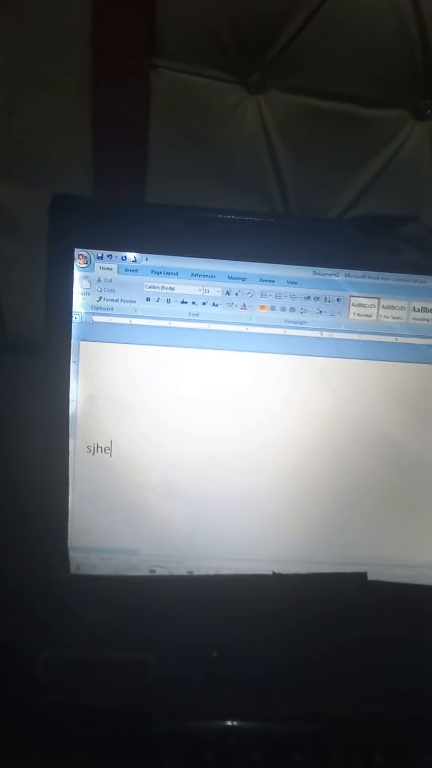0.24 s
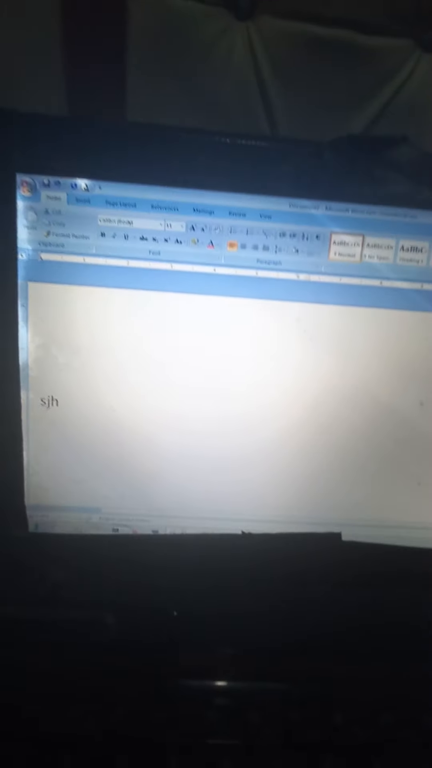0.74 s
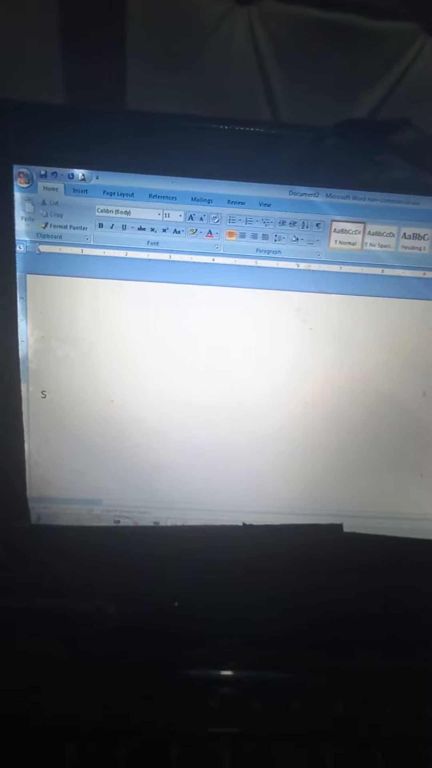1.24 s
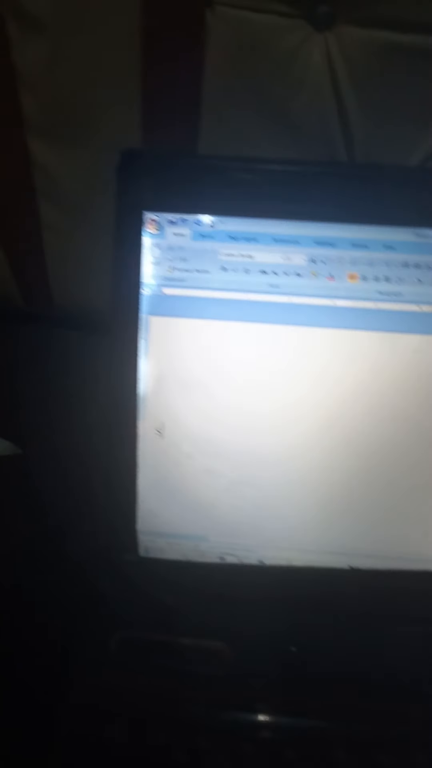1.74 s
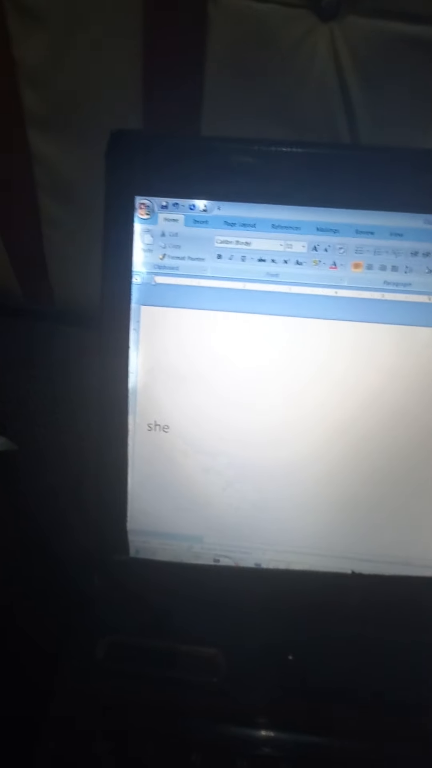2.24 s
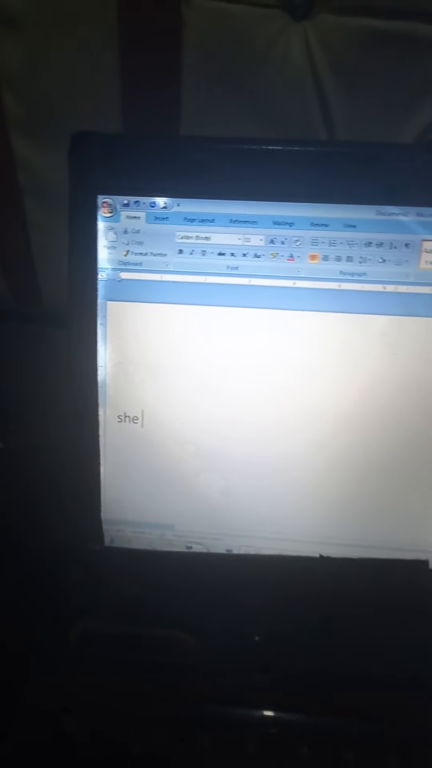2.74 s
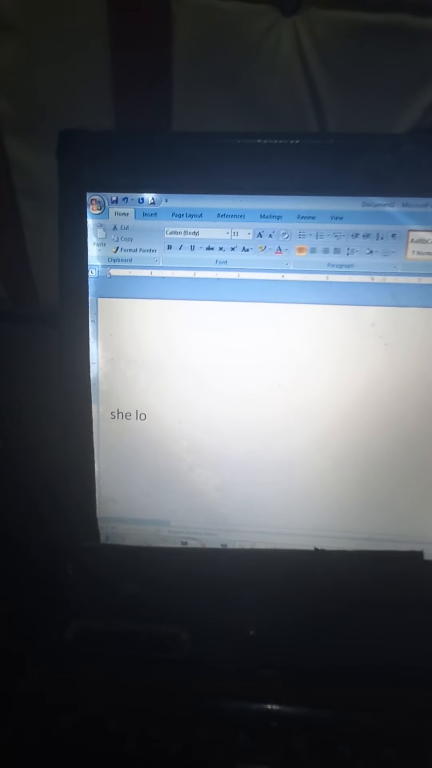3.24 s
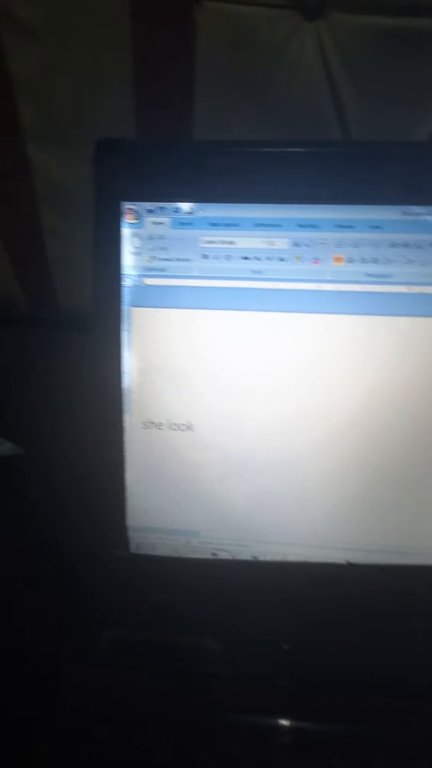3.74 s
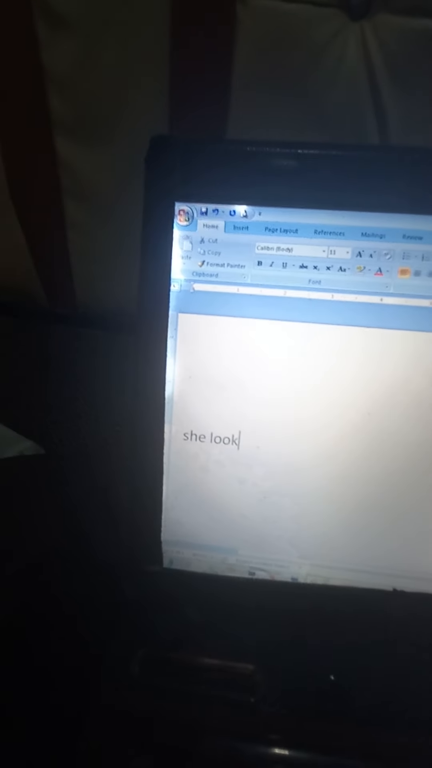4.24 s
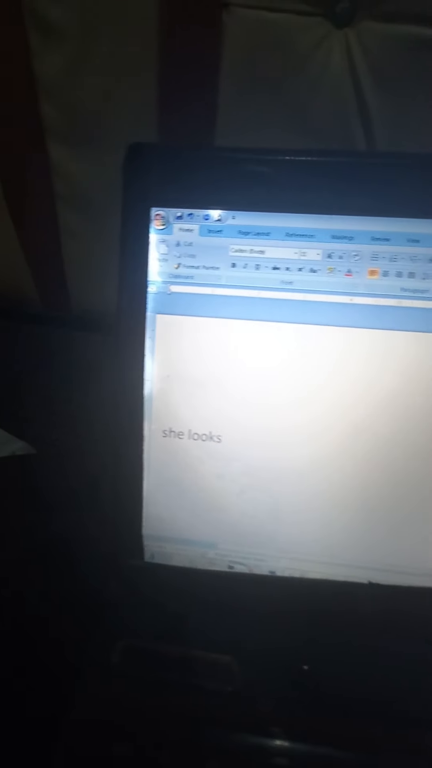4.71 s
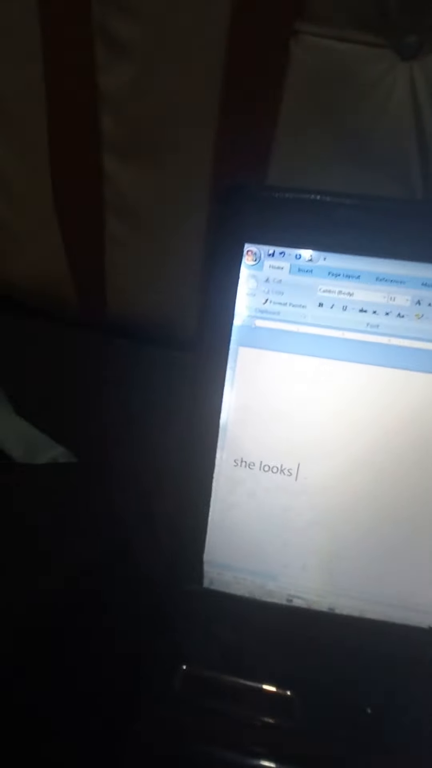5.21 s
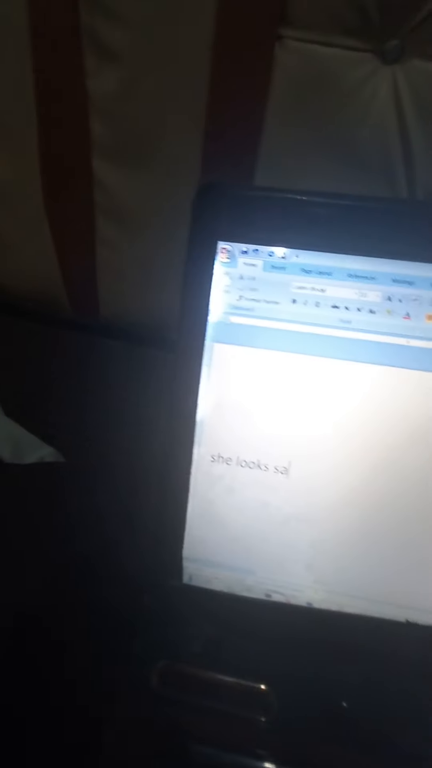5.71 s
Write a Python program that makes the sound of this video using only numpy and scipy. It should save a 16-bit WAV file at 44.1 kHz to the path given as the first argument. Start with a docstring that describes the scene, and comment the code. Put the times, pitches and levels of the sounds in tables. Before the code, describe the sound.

Laptop keys are pressed slowly, one at a time, just below the microphone in a small room. Each gives a plastic clack with a slight thud, and many tick faintly as they spring back. The strokes come unevenly, with a quick little cluster early on and short pauses later. A fan hisses steadily throughout, and moving air buffets the microphone with a low, lumpy rumble.

```python
"""Slow, one-finger typing on a laptop in a small room, from a hand-held microphone just above the keys.
Each key ticks under the nail, hits bottom with a plastic clack and a thud of the case; most spring back
faintly. A fan hisses steadily all around, and moving air buffets the microphone's two ports with a low,
lumpy rumble. The left port faces away from the keys and hears them softer and a little later."""
import sys
import numpy as np
from scipy import signal
from scipy.fft import rfft, irfft
from scipy.io import wavfile
from scipy.ndimage import uniform_filter1d

SR = 44100
rng = np.random.default_rng(int(sys.argv[2]) if len(sys.argv) > 2 else 0)


def dump_mix(stems):
    """Bounce the given channels to the path in sys.argv[1] as a 16-bit WAV at rate SR."""
    frames = np.atleast_2d(stems).T  # one column per channel
    limited = np.clip(frames, -1, 1)  # hard clip at full scale
    pcm = np.round(limited * 32767).astype(np.int16)
    wavfile.write(sys.argv[1], SR, pcm)


N = 263056
HIT = np.arange(4096) / SR   # time within one contact, s


def from_db(db):
    """Decibels to gain."""
    return 10 ** (np.asarray(db) / 20)


def unit_energy(x):
    """Scale each channel to a sum of squares of one."""
    return x / np.sqrt(np.sum(x ** 2, axis=-1, keepdims=True) + 1e-20)


def at_level(x, db):
    """Give a short sound its rms level over 10 ms."""
    return unit_energy(x) * from_db(db) * np.sqrt(SR * 0.01)


def shade_left(x, db):
    """The left port faces away from the keys and hears less."""
    return x * from_db([[db], [0]])


def colour(x, spectrum, size=2 ** 13):
    """Causal (minimum-phase) filter that follows a table of freq_hz, level_db."""
    hz, db = np.transpose(spectrum)
    bin_hz = np.arange(size // 2 + 1) * SR / size
    curve_db = np.interp(np.log(bin_hz + 1), np.log(hz), db)
    cepstrum = irfft(np.log(from_db(curve_db)))[:size // 2]
    cepstrum[1:] *= 2
    response = irfft(np.exp(rfft(cepstrum, size)))[:size // 2]
    return signal.fftconvolve(x, response[None] if x.ndim == 2 else response, axes=-1)[..., :x.shape[-1]]


def resonate(x, hz, width_hz):
    """One resonance, gain one at its top."""
    r = np.exp(-np.pi * width_hz / SR)
    feedback = [1, -2 * r * np.cos(2 * np.pi * hz / SR), r * r]
    return signal.lfilter(np.array([1, 0, -1]) * (1 - r * r) / 2, feedback, x)


def steady_noise(spectrum):
    """Coloured noise of rms one, steady from the start."""
    return unit_energy(colour(rng.standard_normal(N + SR), spectrum)[SR:]) * np.sqrt(N)


def wander(t, step_s):
    """A random drift between -1 and 1, gliding to a new value at every step."""
    knots = np.arange(len(t) // 20) * step_s
    return np.interp(t, knots, rng.uniform(-1, 1, len(knots)))


def uneven(delay_s, spread=0.25):
    """No two rebounds take quite the same time."""
    return delay_s * (1 + spread * rng.uniform(-1, 1))


def add(track, start_s, sound):
    """Mix a sound into a track from start_s on."""
    start = max(round(start_s * SR), 0)
    part = track[..., start:start + sound.shape[-1]]
    part += sound[..., :part.shape[-1]]


def soft_attack(rise_s=0.0005):
    """Each click fades in over about half a millisecond."""
    return 1 - np.exp(-HIT / rise_s)


def hard_contact(peak_s=0.0005, rattle_s=0.0053, rattle_db=-22):
    """Force of plastic on plastic: one hard touch, then a faint rattle."""
    return HIT / peak_s * np.exp(1 - HIT / peak_s) + from_db(rattle_db) * np.exp(-HIT / rattle_s)


def grit(envelope):
    """Rough plastic faces meet in a burst of tiny impacts, partly alike at both ports."""
    noise = rng.standard_normal((3, len(HIT)))
    return (noise[0] + noise[1:]) * envelope


def ring(modes, scatter_db):
    """Modes struck by a key: signs vary by blow, and scatter_db gives each port its own mix."""
    hz, db, t60_s = np.transpose(modes)
    strength = from_db(db + rng.normal(0, scatter_db, (2, len(hz)))) * rng.choice([-1, 1], len(hz))
    decay = np.exp(-np.log(1000) * HIT / t60_s[:, None])
    return soft_attack() * (strength @ (np.sin(2 * np.pi * hz[:, None] * HIT) * decay))


# the fan's air noise, filling the room: freq_hz, density_db
FAN_AIR = [(40, 1.5), (90, 13.5), (220, 6.5), (450, 5.5), (570, -0.5), (1100, 0.5), (1500, -2.5),
           (2200, -3), (3100, -2.5), (4100, -14.5), (5500, -17), (6800, -23), (12500, -20.5),
           (15800, -25.5)]
# the fan at the left port against the right: freq_hz, gain_db
FAN_LEFT = [(200, -6), (400, -3), (700, -4), (1300, -2), (2400, -6.5), (3100, -9.5), (4400, -4),
            (8100, -2.5), (15000, -5)]
# resonances of its motor, duct and grille: pitch_hz, width_hz, boost_db
FAN_RESONANCES = [(287.7, 27, 7.5), (1940, 176, 5.5), (8440, 930, 5.5)]
def fan(level_db=-46.5, port_spacing_m=0.18):
    """A steady rush of air arriving from all sides, with a motor drone and breathy resonances."""
    right, other = steady_noise(FAN_AIR), steady_noise(FAN_AIR)
    # in a diffuse field two ports agree only for waves longer than their spacing
    bin_hz = np.arange(N // 2 + 1) * SR / N
    alike = np.sinc(2 * bin_hz * port_spacing_m / 343)
    left = irfft(alike * rfft(right) + np.sqrt(1 - alike ** 2) * rfft(other), N)
    air = np.array([colour(left, FAN_LEFT), right])
    for hz, width_hz, boost_db in FAN_RESONANCES:
        air = air + (from_db(boost_db) - 1) * resonate(air, hz, width_hz)
    return from_db(level_db) * air


# the draught right on the microphone, left and right port: time_s, strength_db
GUSTS_LEFT = [(0.0, -38.5), (0.29, -27.5), (0.46, -54), (0.56, -25), (0.65, -41), (0.82, -28), (0.93, -33),
              (0.97, -22), (1.15, -28), (1.2, -42.5), (1.32, -28), (1.41, -50.5), (1.98, -45),
              (2.22, -25.5), (2.3, -38), (3.04, -36), (3.77, -36.5), (4.16, -25), (4.29, -39),
              (4.44, -24.5), (4.64, -33), (4.7, -24), (4.99, -51), (5.03, -37.5), (5.46, -32),
              (5.76, -39.5), (5.96, -31.9)]
GUSTS_RIGHT = [(0.0, -48), (1.09, -57), (1.28, -31.5), (1.38, -51.5), (2.13, -36), (2.18, -23),
               (2.26, -36.6), (2.35, -28), (2.46, -43), (3.55, -37.5), (3.65, -49), (3.7, -38.5),
               (4.89, -36), (4.97, -54), (5.38, -34.5), (5.6, -48), (5.64, -36.5), (5.96, -37.5)]
# its large and small swirls: freq_hz, density_db
LARGE_SWIRLS = [(25, -16), (38, -55), (49, -3), (64, -5), (85, 2.5), (125, 2), (170, -7.5), (225, -9.5),
                (290, -17.5), (500, -73.5)]
SMALL_SWIRLS = [(150, -25.5), (235, 5.5), (310, 0), (400, -3.5), (490, -10.5), (600, -18), (900, -28),
                (2000, -71.5)]
def draught(gusts, usual_db=-29.5, lump_db=4.5, flutter_growth=1.47, evenness=0.16):
    """Turbulence at one port: large swirls rumble, small ones flutter and gain on them as a gust grows."""
    t = np.arange(N) / SR
    gust_db = np.interp(t, *np.transpose(gusts)) + lump_db * wander(t, step_s=0.05) - usual_db
    rumble_db = -30.5 + gust_db
    flutter_db = -42 + flutter_growth * gust_db
    out = np.zeros(N)
    for spectrum, db in ((LARGE_SWIRLS, rumble_db), (SMALL_SWIRLS, flutter_db)):
        swirl = steady_noise(spectrum)
        power = uniform_filter1d(swirl ** 2, size=2200) + 1e-6
        out += swirl / power ** (evenness / 2) * from_db(db)   # its own swells evened out a little
    return out


# puffs of air bumping the microphone: centre_s, peak_db, pitch_hz, half_length_s, port (0 left, 1 right)
PUFFS = [(0.122, -22.5, 130.7, 0.0062, 0), (0.172, -17, 230.4, 0.0041, 0), (0.259, -22, 126.7, 0.0037, 0),
         (0.361, -25.5, 117, 0.009, 0), (0.55, -14.5, 106, 0.0088, 0), (0.987, -13, 291, 0.0062, 0),
         (2.074, -21.5, 120.8, .0065, 0), (2.104, -18.5, 93.4, 0.0052, 1), (2.219, -18.5, 248.8, 0.0038, 1),
         (2.428, -19.5, 108.4, .004, 0), (2.716, -22.5, 150, .007, 1), (2.812, -17.5, 111, 0.0056, 0),
         (3.078, -13, 161.4, 0.0037, 0), (3.379, -21, 135, 0.0044, 0), (3.517, -18.5, 112.5, 0.0053, 1),
         (3.526, -13.5, 115, .004, 0), (3.646, -24.5, 108.2, 0.0096, 0), (4.146, -15, 127.4, 0.0039, 0),
         (4.163, -9.5, 219.5, 0.0022, 0), (4.404, -17.5, 174.3, 0.0023, 0), (4.793, -13, 175, 0.0019, 0),
         (5.043, -21, 131.5, 0.0092, 0), (5.239, -26, 194.8, 0.012, 0), (5.258, -22.5, 108, 0.0041, 1),
         (5.439, -24, 253, 0.0064, 0), (5.603, -18.5, 165, .003, 0), (5.707, -18, 121, 0.0027, 0),
         (5.922, -13.5, 148, 0.0045, 0)]
def eddies(wander_oct=0.63):
    """An eddy crossing a port swings the pressure there for a few uneven cycles."""
    out = np.zeros((2, N))
    t = HIT - HIT.mean()
    for centre_s, peak_db, hz, half_s, port in PUFFS:
        swing_hz = hz * 2 ** (wander_oct * wander(HIT, step_s=0.003995))
        cycles = np.cumsum(swing_hz) / SR + rng.random()
        swing = np.sin(2 * np.pi * cycles) * np.exp(-0.5 * (t / half_s) ** 2)
        add(out[int(port)], centre_s - HIT.mean(), from_db(peak_db) * swing)
    return out


# keys pressed just below the microphone; levels are direct sound at the right port, rms over 10 ms:
# start_s, thud_db, knock_db, clack_db, bite_db, snap_db, deck_hz, cap_hz, hinge_hz, snap_hz
KEY_PRESSES = [(0.675, -39.5, -32.5, -25, -34.5, -21, 810, 1940, 2900, 8400),
               (0.8478, -44, -42, -33, -53, -30.5, 685, 1710, 5600, 7400),
               (1.1452, -34, -27, -22.5, -33.5, -19, 1220, 1670, 5160, 12060),
               (1.75, -34.5, -43, -43.5, -53, -38.5, 770, 2300, 6300, 12000),
               (2.0563, -35.5, -35.5, -31.5, -36.5, -31.5, 880, 2030, 6000, 7280),
               (2.2055, -46, -43, -42, -43, -25, 950, 1770, 5250, 11100),
               (2.2124, -34, -31.5, -31, -35.5, -33, 1010, 1980, 2940, 8900),
               (2.3251, -35.5, -45, -41.5, -36, -28.5, 790, 2150, 5540, 10900),
               (2.903, -40.5, -48, -29, -42, -30.5, 1210, 1360, 5650, 6950),
               (3.138, -41, -34.5, -34.5, -40, -29, 875, 1870, 4900, 14700),
               (3.572, -39, -43, -41.5, -43, -36, 710, 1890, 5960, 8800),
               (4.3465, -35, -39, -28, -25, -22.5, 1030, 1940, 3770, 8500),
               (4.6014, -32.5, -30, -27.5, -36, -18, 880, 1920, 2880, 11660),
               (5.308, -62, -62, -37, -39, -41.5, 1170, 1930, 3300, 7700),
               (5.5064, -38.5, -32.5, -38.5, -37, -29, 930, 1750, 6140, 11850),
               (5.7561, -23, -28.5, -27.5, -34, -25.5, 940, 2100, 3200, 9800)]
def keystrokes():
    """The nail lands and a key hits its stop: hinge and cap snap, cap and deck ring, the case thuds."""
    out = np.zeros((2, N))
    for s, thud_db, knock_db, clack_db, bite_db, snap_db, deck_hz, cap_hz, hinge_hz, snap_hz in KEY_PRESSES:
        add(out, s, plastic_snap(snap_hz, snap_db))
        add(out, s, hinge_bite(hinge_hz, bite_db))
        add(out, s, deck_knock(deck_hz, knock_db))
        add(out, s, case_thud(thud_db))
        add(out, s, cap_clack(cap_hz, clack_db))
    return out + finger_ticks()


def finger_ticks(usual_snap_db=-29, usual_travel_s=0.0033, shortening=0.11, rebound_s=0.006):
    """The nail lands just before each stroke, the closer the harder it is; the cap rebounds just after."""
    contacts = []
    for s, _, _, _, _, snap_db, *_ in KEY_PRESSES:
        travel_s = usual_travel_s * from_db(shortening * (usual_snap_db - snap_db))
        nail = (s - travel_s, snap_db - 6)
        rebound = (s + uneven(rebound_s), snap_db - 18)
        contacts += [nail, rebound]
    return light_ticks(contacts)


# a light touch on a keycap, close up: freq_hz, density_db
TICK_SPECTRUM = [(500, 8), (1500, -2), (3000, 1), (5000, -6.5), (6500, 4), (8300, 5.5), (10000, 1.5),
                 (12000, 6.5), (15500, 1.5), (17000, 12)]
def light_ticks(contacts, half_length_s=0.0015, rub_db=-18, rub_s=0.001):
    """Bright scuffs at (centre_s, level_db) that do not move the case: a sharp touch in a softer rub."""
    out = np.zeros((2, N))
    away_s = np.abs(HIT - HIT.mean())
    touch = np.exp(-(away_s / half_length_s) ** 2) + from_db(rub_db) * np.exp(-away_s / rub_s)
    for centre_s, db in contacts:
        add(out, centre_s - HIT.mean(), at_level(colour(grit(touch), TICK_SPECTRUM), db))
    return shade_left(out, -10)


# plastic on plastic, close up: freq_hz, density_db
SNAP_SPECTRUM = [(3500, -8), (5600, -7), (6900, -4.5), (7600, 3.5), (8500, 2.5), (9200, 0), (10800, 0.5),
                 (12000, 2.5), (13500, 0), (15600, 2), (17000, 3.5)]
def plastic_snap(hz, db):
    """The key meets its stop in a bright burst with one narrow ring."""
    snap = colour(grit(hard_contact() * soft_attack()), SNAP_SPECTRUM)
    snap = snap + 3.3 * resonate(snap, hz, width_hz=200)
    return shade_left(at_level(snap, db), -11)


# the little hinge under a cap: freq_hz, density_db
HINGE_SPECTRUM = [(1700, -21.5), (2700, -2.5), (3250, -5.5), (3750, 1), (4400, -10.5), (5600, -3.5),
                  (7000, -10)]
def hinge_bite(hz, db):
    """The jolted hinge clicks and rings at its own pitch."""
    bite = colour(grit(hard_contact()), HINGE_SPECTRUM)
    bite = bite + 2 * resonate(bite, hz, width_hz=180)
    return shade_left(at_level(bite, db), -8.5)


# the deck under the keys: pitch_hz, level_db, t60_s
DECK_RING = [(605, -8, 0.023), (764, -21, 0.052), (1360, 12.5, 0.0025)]
def deck_knock(hz, db):
    """The struck deck rings in its common modes and one that this key favours."""
    knock = ring(DECK_RING + [(hz, 0, 0.014)], scatter_db=1.5)
    return shade_left(at_level(knock, db), -7)


# the laptop's case: pitch_hz, level_db, t60_s
CASE_RING = [(197, 3, 0.028), (280, 8.5, 0.012), (373, 4, 0.025), (446, -14, 0.018)]
def case_thud(db):
    """The blow sets off the low, short-lived modes of the case."""
    return shade_left(at_level(ring(CASE_RING, scatter_db=2), db), -4)


# the key plate's overtones: pitch_hz, level_db, t60_s
PLATE_RING = [(1252, -3, 0.015), (1770, 6, 0.0028), (2070, -28.5, 0.009)]
def cap_clack(hz, db, cap_t60_s=0.018, crunch_db=-9):
    """A keycap rings with the key plate, over a little crunch."""
    crunch = unit_energy(resonate(grit(hard_contact()), hz=1290, width_hz=1500))
    modes = unit_energy(ring(PLATE_RING + [(hz, 0, cap_t60_s)], scatter_db=0))
    return shade_left(at_level(modes + from_db(crunch_db) * crunch, db), -9.5)


# the small room's tail at the microphone: freq_hz, gain_db
TAIL_COLOUR = [(150, 1), (700, -2), (2000, 3), (5000, 4), (9000, 0.5), (15000, -0.5)]
def room(keys, near_t60_s=0.031, tail_t60_s=0.38, build_s=0.0011, grain_db=4.5):
    """A quick ring of the laptop's case, then the room's tail: each band dies away as noise."""
    t = np.arange(SR) / SR
    onset = 1 - np.exp(-(t / build_s) ** 2)
    near, tail = (onset * np.exp(-np.log(1e6) * t / t60_s) for t60_s in (near_t60_s, tail_t60_s))
    # reflections arrive in clumps about a millisecond long
    clumps = unit_energy(uniform_filter1d(rng.standard_normal(N), size=45)) * np.sqrt(N)
    scatter = rng.standard_normal((2, 2, N)) * from_db(grain_db * clumps)
    edges_hz = np.geomspace(150, 17000, 11)
    out = np.zeros((2, N))
    for k, (low, high) in enumerate(zip(edges_hz, edges_hz[1:])):
        band = signal.butter(2, [low, high], "band", fs=SR, output="sos")
        hz = np.sqrt(low * high)
        near_db = -14.5 - 5 * np.log2(hz / 2000)
        tail_db = -17 + np.interp(hz, *np.transpose(TAIL_COLOUR))
        decay = near / near.sum() * from_db(near_db) ** 2 + tail / tail.sum() * from_db(tail_db) ** 2
        power = signal.fftconvolve(signal.sosfilt(band, keys[1] + 1e-18) ** 2, decay)[:N]
        out += np.sqrt(np.maximum(power, 0) * N) * unit_energy(signal.sosfilt(band, scatter[k % 2]))
    return shade_left(out, -3)


# walls and ceiling, a few metres off: delay_s, gain_db
WALLS = [(0.0164, -28.5), (.0243, -31)]
def echoes(keys, spread_s=0.00049):
    """The nearest walls return each key once, reaching the two ports at slightly different moments."""
    t = np.arange(N) / SR
    out = np.zeros((2, N))
    for port in out:
        for delay_s, db in WALLS:
            port += from_db(db) * np.interp(t - delay_s - rng.normal(0, spread_s), t, keys[1])
    return shade_left(out, -3)


# keys springing back up below the microphone: start_s, tick_db, clack_db
KEY_RELEASES = [(0.7686, -36.5, -47), (0.928, -40, -41), (1.227, -39.5, -42), (1.8271, -51, -68),
                (1.8502, -46.5, -64), (2.1457, -48, -62), (2.997, -49, -62), (3.2616, -46.5, -60),
                (3.3516, -47.5, -63), (4.7199, -27, -52), (5.4138, -40, -57), (5.607, -48, -51),
                (5.837, -52, -62)]
def releases(bounce_s=0.0029, bounce_db=-3):
    """The key last pressed springs up: it ticks, bounces once, and its cap rings faintly."""
    out, contacts = np.zeros((2, N)), []
    for s, tick_db, clack_db in KEY_RELEASES:
        cap_hz = [hz for pressed_s, *_, hz, _, _ in KEY_PRESSES if pressed_s < s][-1]
        add(out, s, cap_clack(cap_hz, clack_db))
        contacts += [(s, tick_db), (s + uneven(bounce_s), tick_db + bounce_db)]
    return out + light_ticks(contacts)


def scene(left_lag_s=0.000367):
    """Keys close below the microphone, the room and fan around it, and air on its ports."""
    keys = keystrokes() + releases()
    t = np.arange(N) / SR
    direct = np.array([np.interp(t - left_lag_s, t, keys[0]), keys[1]])
    wind = np.array([draught(GUSTS_LEFT), draught(GUSTS_RIGHT)]) + eddies()
    return direct + echoes(keys) + room(keys) + fan() + wind


def record(dry):
    """The hand-held recorder cuts the deepest bass and the top."""
    low_cut = signal.butter(6, 42, "high", fs=SR, output="sos")
    high_cut = signal.ellip(10, 0.2, 80, 15850, fs=SR, output="sos")
    return signal.sosfilt(high_cut, signal.sosfilt(low_cut, dry))


dry = scene()
out = record(dry)
dump_mix(out)
```